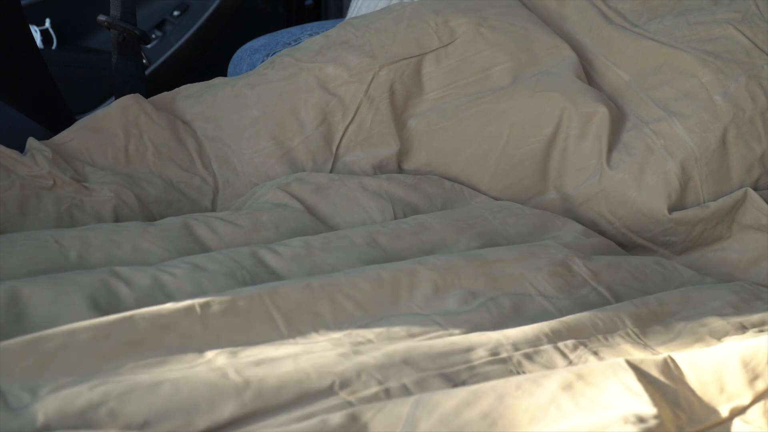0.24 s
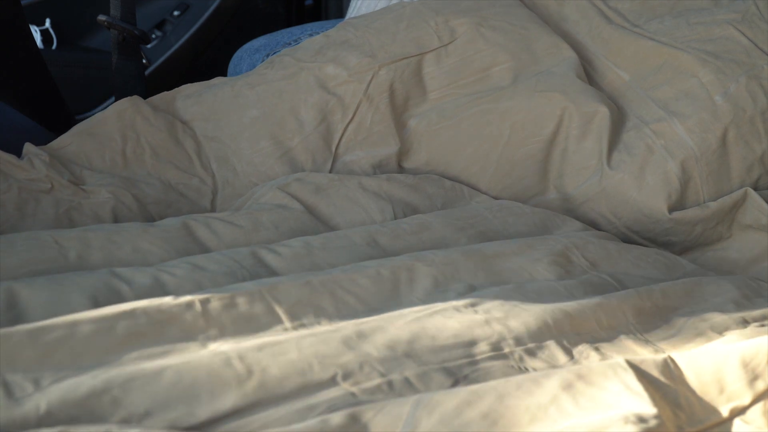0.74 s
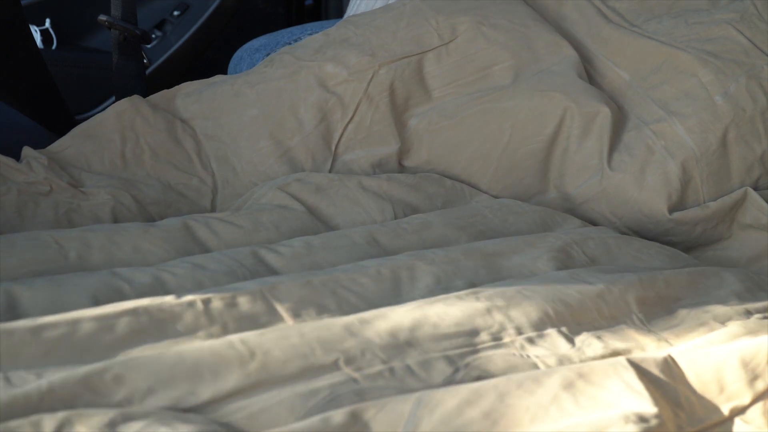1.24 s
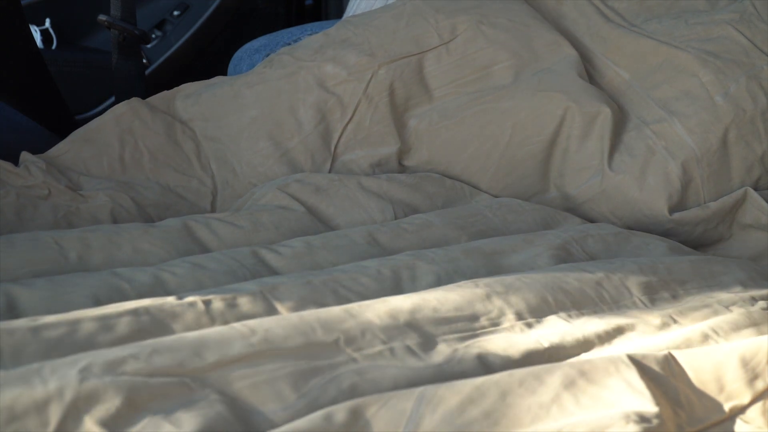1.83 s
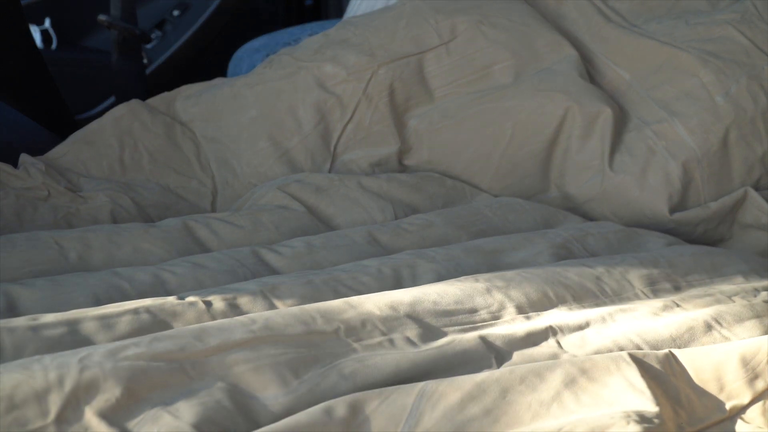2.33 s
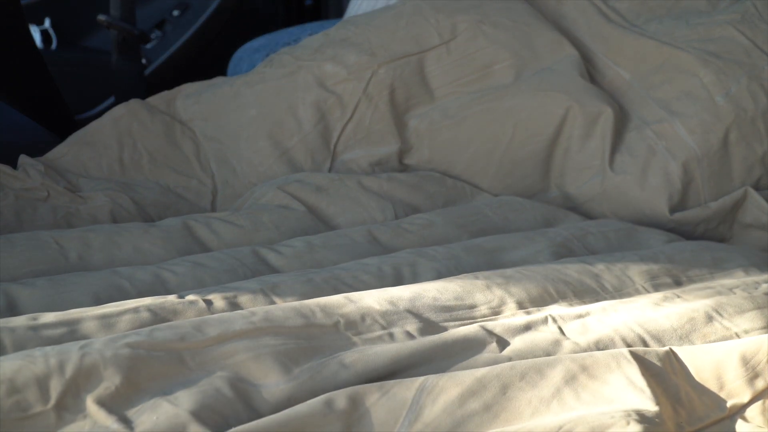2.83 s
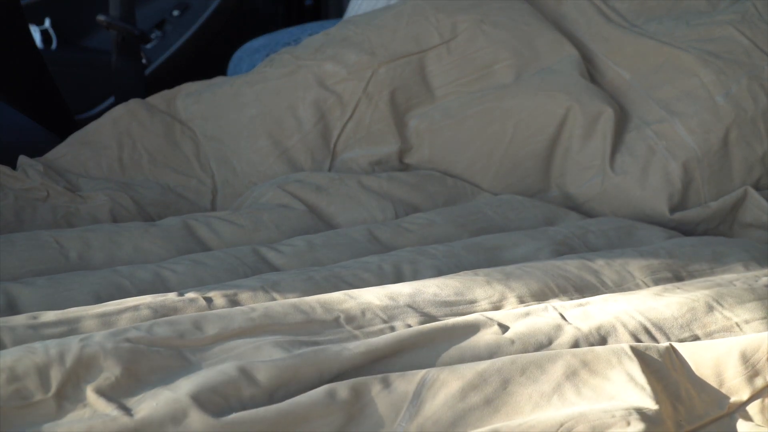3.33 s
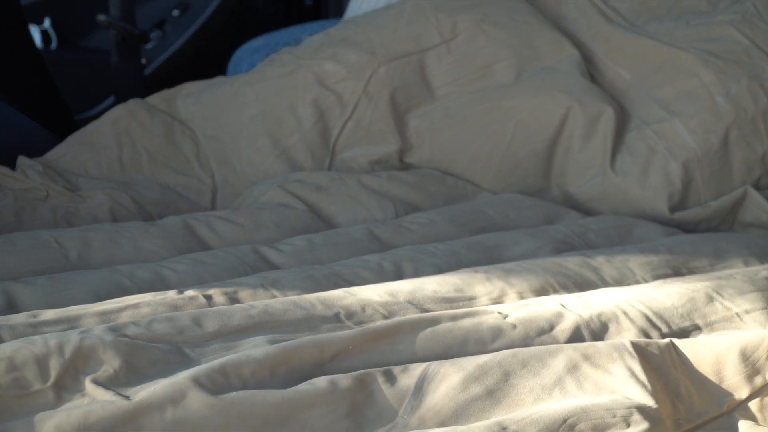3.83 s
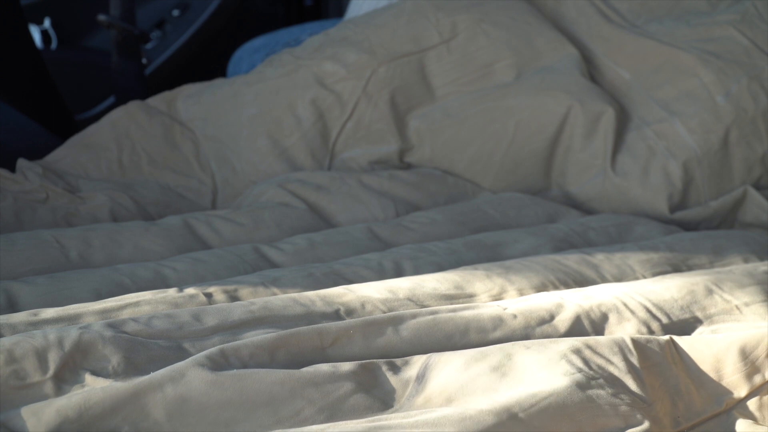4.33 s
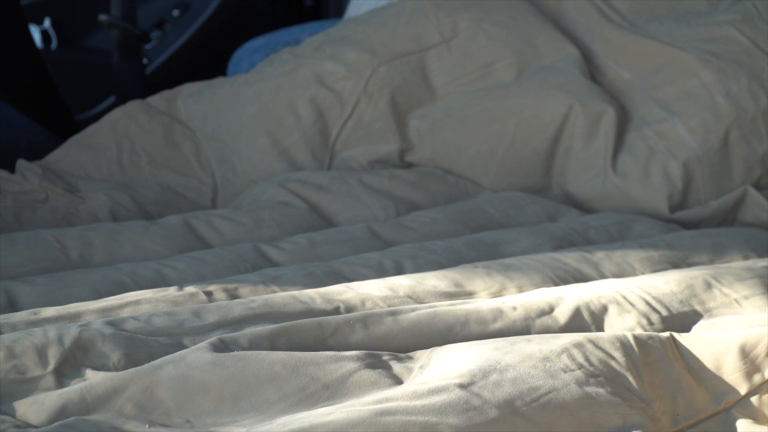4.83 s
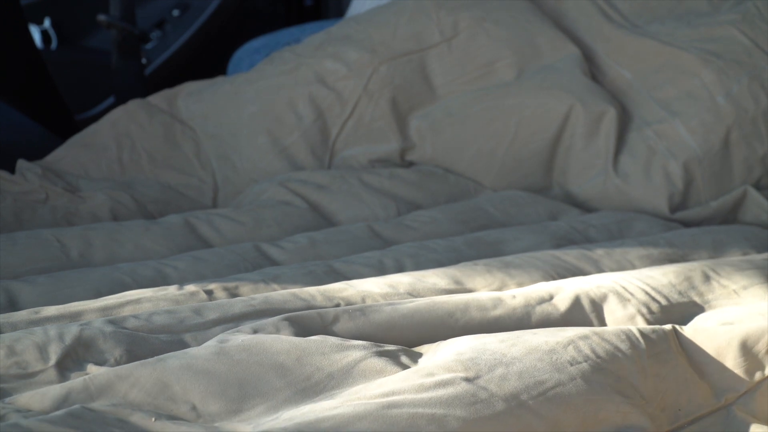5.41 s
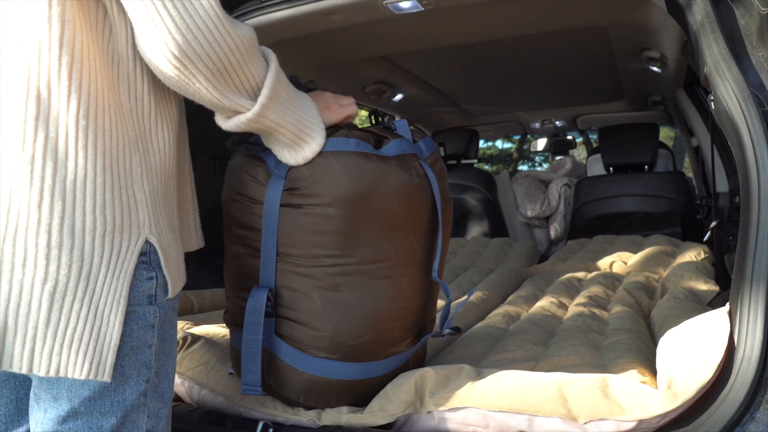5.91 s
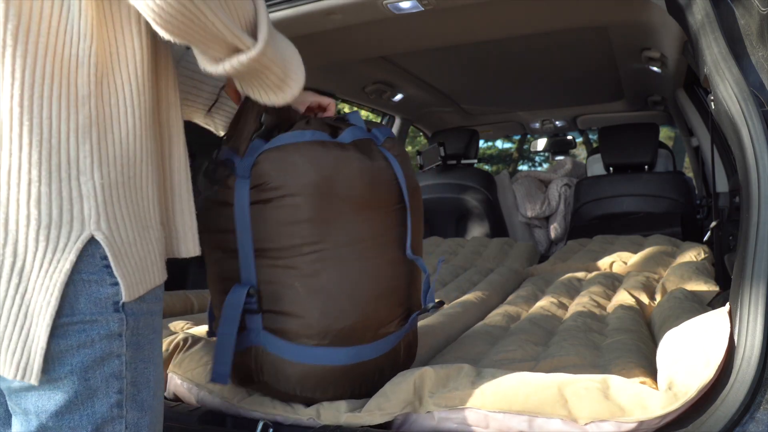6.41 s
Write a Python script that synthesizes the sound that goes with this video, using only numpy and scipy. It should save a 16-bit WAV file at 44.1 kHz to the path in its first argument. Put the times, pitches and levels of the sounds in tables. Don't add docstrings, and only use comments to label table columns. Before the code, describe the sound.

Steady high-pitched pump whine and airy hiss with light wind thumps, suddenly replaced by heavy wind gusts on the microphone, leaves and nylon rustling.

```python
import sys
import numpy as np
from scipy import signal
from scipy.fft import irfft, next_fast_len
from scipy.io import wavfile
from scipy.ndimage import uniform_filter1d, minimum_filter1d

SR = 44100
rng = np.random.default_rng(int(sys.argv[2]) if len(sys.argv) > 2 else 0)


def rack_gain(trim_db):
    fader = np.asarray(trim_db, float)
    return 10 ** (fader / 20)


def wrap_up_sound(samples):
    columns = np.atleast_2d(samples).T
    tamed = np.clip(columns, -1, 1)
    steps = np.round(tamed * 32767).astype(np.int16)
    wavfile.write(sys.argv[1], SR, steps)


N = 293706
T = np.arange(N) / SR
SLOW = np.arange(0, N + 64, 32) / SR
SIDES = np.array([[1.], [-1.]])
SCENE_CHANGE_S = 5.661
# the bounds in seconds between its flat, rising, plump and firm stages.
FILL_S = [1.15, 1.6, 2.6, 3.1, 4.15, 4.45]


def fine(slow):
    ramps = np.diff(slow)[:, None] * np.arange(32) / 32
    return (slow[:-1, None] + ramps).ravel()[:N]


def curves(table):
    s, *columns = np.transpose(table)
    return [np.interp(SLOW, s, c) for c in columns]


def at(table, hz):
    f, v = np.transpose(table)
    return np.interp(np.log(hz), np.log(f + 1), v)


def walk(rate):
    hold = max(int(1 / SLOW[1] / rate), 1)
    steps = np.repeat(rng.standard_normal(len(SLOW) // hold + 1), hold)
    smooth = uniform_filter1d(uniform_filter1d(steps, hold), hold)
    return 1.3 * smooth[:len(SLOW)]


def band(hz, octaves):
    size = next_fast_len(N)
    lowest = int(size * hz / SR / 6 ** octaves)
    highest = min(int(size * hz / SR * 6 ** octaves), size // 2)
    bins = np.arange(lowest, highest)
    bell = np.exp(-(np.log2(bins * SR / size / hz) / octaves) ** 2)
    draws = rng.standard_normal((2, 2, len(bins)))
    spectrum = np.zeros((2, size // 2 + 1), np.complex64)
    spectrum[:, bins] = (draws[0] + 1j * draws[1]) * bell
    return irfft(spectrum, size)[:, :N] * np.sqrt(size / 2)


def noise(colour, count, shape, ref_hz, side, flicker_db, rate, lag_s=0., steady=0.):
    centres = np.geomspace(colour[0][0], colour[-1][0], count)
    step = np.log2(centres[1] / centres[0])
    out = 0
    for hz in centres:
        mid, own = band(hz, step * .8)
        if steady:
            strength = np.sqrt(uniform_filter1d(mid ** 2, int(3 * SR / hz))) / mid.std()
            mid = mid / (strength + .1) ** steady
        late = np.roll(mid, int(lag_s * SR))
        pair = np.array([mid + side(hz) * own, late - side(hz) * own])
        level_db = at(colour, hz) + shape(hz) + flicker_db * walk(rate)
        out = out + fine(rack_gain(level_db)) * pair
    return out * np.sqrt(SR / 2 / ref_hz)


def motor():
    # time in seconds, shaft rate in Hz, hum in dB.
    shaft = [(0.0, 472, -33.5), (0.12, 472.7, -31), (0.55, 473.8, -29), (1.25, 474.2, -28),
             (1.6, 475.6, -27.7), (2.8, 477, -23.8), (3.2, 476.7, -24.3), (4.2, 477.3, -24.3),
             (4.65, 475.7, -24.3), (5.03, 477.2, -22.5), (5.2, 476.2, -24.5), (5.64, 475.9, -25)]
    # time in seconds, left level in dB,
    # right level in dB, lead of the left port in radians.
    blade_tone = [(0.0, -27.5, -23.5, 1.4), (1.27, -23.5, -32, .9), (1.4, -34.5, -30.5, -.5),
                  (2.35, -33, -29, 1), (2.9, -24.5, -27.5, 1.3), (3.7, -24, -23.5, .4),
                  (3.85, -28, -32, .6), (4.4, -23.5, -29.5, .2), (4.55, -25, -30, .2),
                  (4.68, -23, -25.5, .2), (4.93, -23.5, -32, .2), (5.03, -34, -34, -2.6),
                  (5.13, -25.5, -22, .6), (5.21, -28.5, -29, -2.2), (5.27, -23.5, -45, -6.5),
                  (5.45, -23.5, -35, -5), (5.53, -35, -31, -2.5), (5.62, -26, -33, -4)]
    # multiple of the shaft rate, then level in dB at flat, rising, plump, firm.
    orders = [(2, -55, -46, -42, -39), (3, -59, -49, -47, -52), (4, -55, -39, -38, -45),
              (5, -47, -42, -39, -42), (6, -51, -49, -51, -45), (7, -44, -41, -40, -42),
              (9, -52, -44, -50, -48), (10, -49, -53, -52, -51), (15, -64, -57, -56, -48),
              (16, -50, -48, -48, -50), (17, -60, -54, -46, -55), (20, -67, -52, -54, -56),
              (24, -61, -57, -56, -51), (32, -56, -47, -50, -51)]
    order_pan_db = [0, 5, 7, 4, -9, -4, -4, 3, -1, -9, 2, -1, -5, -3]
    # frequency in Hz, lead of the left port in radians.
    port_lead = [(0, 0), (260, 0.13), (860, 0.092), (3010, 0.84), (3360, 0.98), (4310, -0.27), (5080, 0.4),
                 (5680, 1), (9560, 0.98), (10800, 0.25), (11500, 0.8), (11800, 0.1), (14200, 0.3),
                 (15300, -0.089)]
    faint_orders = (11, 12, 13, 14, 18, 21, 31)
    # dB at flat, rising, plump, firm.
    faint_db = (-64, -57, -57.5, -56)

    hz, hum_db = curves(shaft)
    left_db, right_db, blade_lead = curves(blade_tone)
    unsteady_hz = hz * (1 + 0.00029 * walk(40))
    turn = 2 * np.pi * np.cumsum(fine(unsteady_hz)) / SR

    def line(k, db, pan_db, lead):
        start = rng.uniform(0, 2 * np.pi)
        ports = []
        for side in (1, -1):
            phase = int(k) * turn + fine(start + side * lead / 2)
            ports.append(fine(rack_gain(db + side * pan_db / 2)) * np.sin(phase))
        return np.array(ports)

    still = np.zeros_like(hz)
    out = line(1, hum_db + 0.15 * walk(45), still - 1.2, still + .14)
    blade_db = (left_db + right_db) / 2 + 3.5 + .5 * walk(45) + 0.53 * walk(300)
    out = out + line(8, blade_db, left_db - right_db, blade_lead)
    restless = SLOW > FILL_S[-1]
    faint = [(k, *faint_db) for k in faint_orders]
    pans = list(order_pan_db) + [0] * len(faint)
    for (k, flat, rising, plump, firm), pan in zip(list(orders) + faint, pans):
        db = np.interp(SLOW, FILL_S, [flat, rising, rising, plump, plump, firm])
        db = db + min(k / 8, 2.5) * walk(3) + .9 * walk(45)
        db = db + min(k - 2, 3) * restless * (walk(9) - .4)
        pan_db = pan + min(k / 8, 2) * walk(1.2)
        lead = at(port_lead, k * hz[0]) + min(k / 30, .4) * walk(1.2)
        out = out + line(k, db, pan_db, lead)
    return np.sqrt(2) * out, turn


def air(turn):
    # time in seconds, rush in dB.
    nozzle = [
        (0.0, -47.5),
        (0.3, -44.5),
        (1.3, -44),
        (2.9, -39.5),
        (3.5, -40.3),
        (4.2, -41),
        (4.45, -38.5),
        (5.1, -37.8),
        (5.66, -39),
    ]
    # frequency in Hz, density in dB per Hz.
    rush_colour = [(500, -1), (750, -7.5), (1000, -11.5), (1500, -10.5), (2000, 0.5), (2500, -2.5),
                   (3100, -1), (3700, -1), (4400, -4), (6000, -6.5), (7500, -10.5), (9000, -12.5),
                   (12000, -18), (15500, -15)]
    roar_growth_db, roar_wander_db, hiss_wander_db = 3.5, .8, 1.1
    cabin_t60_s = .1

    rush_db = curves(nozzle)[0] + .5 * walk(12)
    fill = np.clip(SLOW / FILL_S[-1], 0, 1) - .5
    low, top = roar_wander_db * walk(5), hiss_wander_db * walk(4)

    def shape(hz):
        roar = roar_growth_db * fill * (1800 < hz < 3600)
        low_part = low * np.clip(np.log2(4500 / hz), 0, 1)
        top_part = top * np.clip(np.log2(hz / 7000) / .8, 0, 1)
        return rush_db + roar + low_part + top_part

    rush = noise(rush_colour, count=16, shape=shape, ref_hz=587,
                 side=lambda hz: min(0.19 + hz / 25000, .6), flicker_db=0.9, rate=12)
    narrow_rush = band(3700, .075)[0]
    rush = rush + fine(rack_gain(rush_db - 2.5)) * narrow_rush / narrow_rush.std()
    t = np.arange(SR // 10) / SR
    shared, own = rng.standard_normal((2, len(t))) * rack_gain(-60 * t / cabin_t60_s)
    echoes = shared + 0.45 * SIDES * own
    echoes[:, 0] += 36.0
    echoes = echoes / np.sqrt(np.sum(echoes ** 2) / 2)
    throb = 1 + 0.31 * np.sin(turn)
    return signal.fftconvolve(rush * throb, echoes, axes=1)[:, :N]


def rustle():
    # time in seconds, rustle in dB.
    leaves = [
        (5.67, -46),
        (5.77, -44.5),
        (5.86, -55),
        (5.95, -50),
        (6.05, -58),
        (6.266, -65),
        (6.274, -49.5),
        (6.39, -55),
        (6.634, -31.5),
    ]
    # frequency in Hz, density in dB per Hz.
    rustle_colour = [(350, -34), (600, 3), (810, 11), (993, 2.5), (1150, -1.5), (2510, 1), (2760, -2),
                     (8790, -2.5), (15600, -6.5)]
    tilt_slope, nylon_from_db = -1.1, -46
    drone_db, drone_until_s = 4.5, 6.08
    sleeve_db, sleeve_until_s = 4, 5.86

    high_db = curves(leaves)[0]
    tilt = np.clip(tilt_slope * (high_db - nylon_from_db), 0, 6.5)
    drone = drone_db * np.clip((drone_until_s - SLOW) / .1, 0, 1)
    sleeve = sleeve_db * np.clip((sleeve_until_s - SLOW) / .1, 0, 1)

    def shape(hz):
        dull = tilt * np.clip(np.log2(6000 / hz) / 1.73, 0, 1.5)
        return high_db + dull + sleeve * (hz > 7500) + drone * (600 < hz < 1200)

    hiss = noise(rustle_colour, count=12, shape=shape, ref_hz=3020,
                 side=lambda hz: .52, flicker_db=0.1, rate=39)
    crackle = fine(rack_gain(1.3 * walk(400)))
    return hiss * crackle


def gusts():
    # time of the top in seconds, level in dB, time to fall 6 dB in seconds,
    # brightness in dB.
    gust_tops = [(0.0, -28, .03, -13), (0.21, -36, .035, -10), (0.48, -37, .03, -15), (0.6, -27, .02, -3),
                 (0.68, -26, .025, -5), (0.87, -27, .028, -7), (1.2, -36, .05, -11), (1.68, -34, .07, -8),
                 (1.93, -38, .06, -3), (2.25, -30, .05, -6), (3.02, -30.5, .05, -5), (3.18, -32, .04, -3),
                 (3.55, -34, .06, -12), (3.84, -32, .07, -1), (3.99, -32, .04, -8), (4.14, -31, .08, -2),
                 (5.05, -37, .03, -16), (5.15, -39, .04, -1), (5.33, -25, .035, -8), (5.62, -35, .04, -20),
                 (5.69, -24.5, .02, -1), (5.77, -26, .025, -16), (5.865, -18.5, .02, -6.5),
                 (5.95, -20, .04, -4), (6.09, -22, .045, -1), (6.185, -20, .022, -6),
                 (6.37, -29, .025, -20), (6.45, -22.5, .028, -6.5), (6.54, -28, .035, -14),
                 (6.64, -33, .05, 4)]
    # time in seconds, level in dB.
    breeze_curve = [
        (0.0, -54),
        (1.0, -47),
        (2.0, -39),
        (2.5, -46),
        (3.3, -39),
        (4.4, -37),
        (5.5, -44),
        (5.7, -32),
        (6.66, -31),
    ]
    breeze_bright_db = -13

    s, top_db, fall_s, bright_db = np.transpose(gust_tops)[:, :, None]
    breeze = rack_gain(curves(breeze_curve)[0]) ** 2
    puffs = rack_gain(top_db - 6 * (np.abs(SLOW - s) / fall_s) ** 1.5) ** 2
    total = breeze + puffs.sum(axis=0)
    brightness = (breeze * breeze_bright_db + (puffs * bright_db).sum(axis=0)) / total
    return 10 * np.log10(total), brightness


def wind():
    # frequency in Hz, density in dB per Hz.
    wind_colour = [(25, -9), (50, 0.5), (90, 5), (140, -2), (250, 0), (400, -2), (700, -24.5), (1400, -45)]
    # time in seconds, peak in dB, pitch in Hz.
    strong_eddies = [(0.589, -22, 102), (0.646, -21, 307), (0.841, -20.5, 195), (1.671, -24, 129),
                     (2.228, -18, 113), (3.127, -21, 102), (3.994, -23, 140), (4.086, -22, 241),
                     (4.213, -20, 223), (5.679, -16.5, 122), (5.695, -15, 200), (5.847, -14, 164),
                     (5.864, -12, 150), (5.901, -13, 231), (5.919, -14, 150), (5.939, -17, 127),
                     (5.959, -15, 121), (5.979, -15, 193), (6.041, -13.5, 229), (6.079, -9, 243),
                     (6.099, -8, 121), (6.119, -15, 140), (6.138, -11, 160), (6.159, -12, 167),
                     (6.175, -15, 261), (6.199, -18, 129), (6.424, -12.5, 190), (6.454, -12.5, 148),
                     (6.519, -23, 121)]
    port_lag_s = .0005
    small_db, small_scatter_db, small_hz = 7, 4, 150

    gust_db, bright_db = gusts()
    gust_db = gust_db + 1.5 * walk(14)
    bright_db = bright_db + 1.6 * walk(18)
    open_db = 14 * (SLOW > SCENE_CHANGE_S)
    spikes_db = 3.8 * walk(90)

    def shape(hz):
        upper = (bright_db + spikes_db) * np.clip(np.log2(hz / 170) / 0.63, 0, 1)
        return gust_db + upper + open_db * np.exp(-(np.log2(hz / 850) / .6) ** 2)

    out = noise(wind_colour, count=10, shape=shape, ref_hz=200, side=lambda hz: min(.03 + hz / 450, .6),
                flicker_db=1.5, rate=35, lag_s=port_lag_s, steady=0.59)
    when, size, pitch = rng.uniform(0, 1, size=(40, 3)).T
    when = when * (T[-1] - .05)
    peak_db = np.interp(when, SLOW, gust_db) + small_db - 2 * small_scatter_db * size
    eddies = list(strong_eddies) + list(zip(when, peak_db, small_hz * 2 ** (pitch - .5)))
    chance = rng.uniform(-1, 1, (len(eddies), 2))
    for (s, db, hz), (phase, pan) in zip(eddies, chance):
        t = np.arange(int(2.1 * SR / hz)) / SR
        swing = np.cos(2 * np.pi * hz * t * (1.3 - 0.25 * hz * t))
        pop = np.sign(phase) * hz * t * np.exp(-3.0 * hz * t) * swing
        pop = pop + 0.15 * np.sign(phase) * np.exp(-((t - 0.297 / hz) / 0.00063) ** 2)
        pop = pop / np.abs(pop).max()
        for port in range(2):
            i = int((s + port * port_lag_s) * SR)
            level = rack_gain(db - 1.0 + 2.4 * pan * SIDES[port])
            out[port, i:i + len(t)] += (level * pop)[:N - i]
    return out


def far():
    # frequency in Hz, density in dB per Hz.
    traffic_colour = [(25, -12), (60, 6), (120, -7.5), (250, -19.5), (400, -8.5), (700, -16), (1200, -17.5)]
    traffic_db = -44
    return noise(traffic_colour, count=8, shape=lambda hz: traffic_db, ref_hz=121,
                 side=lambda hz: .18, flicker_db=1.5, rate=3.193)


def scene():
    # time in seconds, change in dB, recovery time in seconds.
    ducks = [(.588, -4.5, .05), (.68, -1.5, .04), (.85, -2.5, .06), (2.988, -6, .035), (3.152, -4, .04),
             (3.6, -2.5, .03), (3.8, -2, .08), (4.0, -1.5, .04), (4.19, -2, .05), (4.62, -1, .04),
             (5.31, -3, .05), (5.345, -4, .08)]

    lines, turn = motor()
    duck_db = 0
    for s, db, back_s in ducks:
        drop = np.clip((SLOW - s) / 0.0045, 0, 1)
        recovery = np.exp(-np.maximum(SLOW - s, 0) / back_s)
        duck_db = duck_db + db * drop * recovery
    inside = np.clip((SCENE_CHANGE_S - T) / .0015, 0, 1)
    pump = fine(rack_gain(duck_db)) * (lines + air(turn))
    return inside * pump + (1 - inside) * rustle() + wind() + far()


def band_limit(x):
    return signal.sosfilt(signal.butter(12, 15730, fs=SR, output="sos"), x)


def record(dry):
    peak = -minimum_filter1d(-np.abs(dry).max(axis=0), size=882)
    gain = np.minimum(1, (0.34 / (peak + 1e-9)) ** .5)
    gain = uniform_filter1d(gain, size=441)
    low_pass = signal.ellip(8, .2, 70, 15800, fs=SR, output="sos")
    mix = signal.sosfilt(low_pass, dry * gain)
    return band_limit(mix)


dry = scene()
out = record(dry)
wrap_up_sound(out)
```